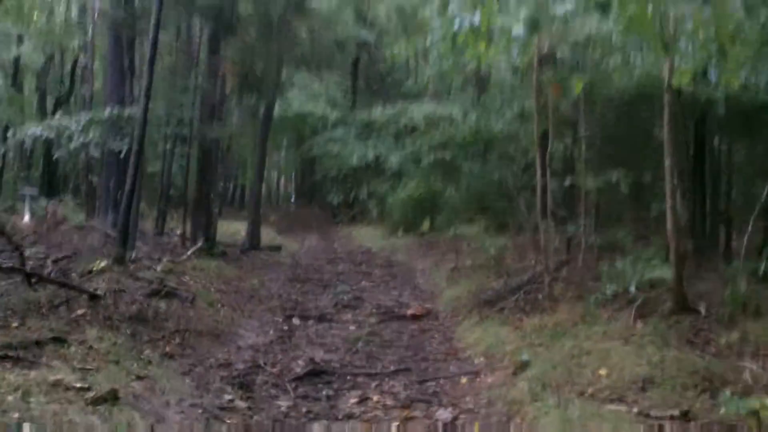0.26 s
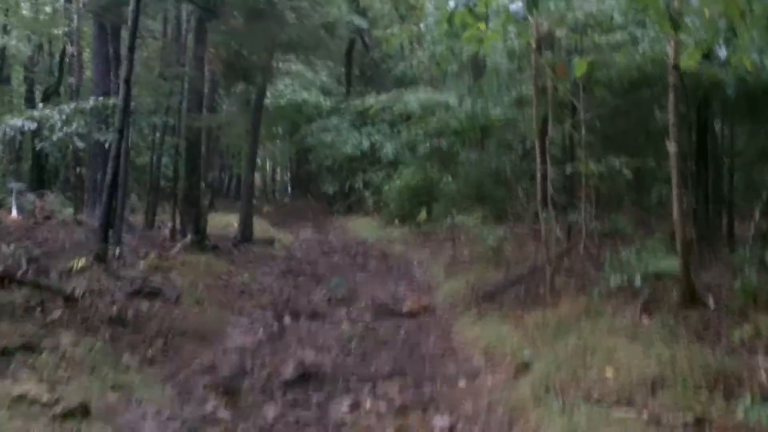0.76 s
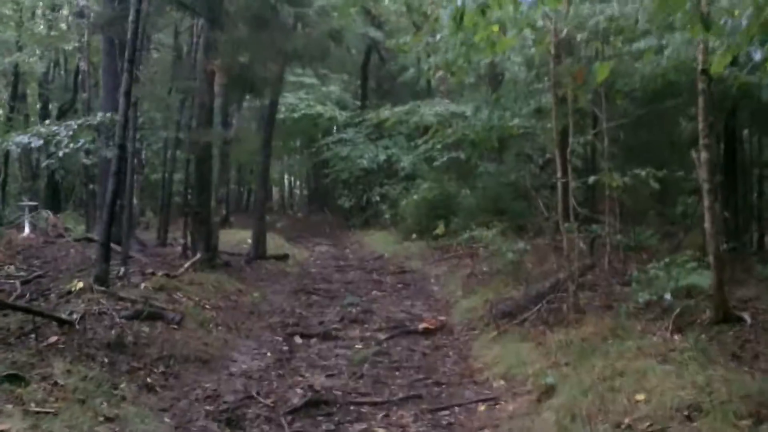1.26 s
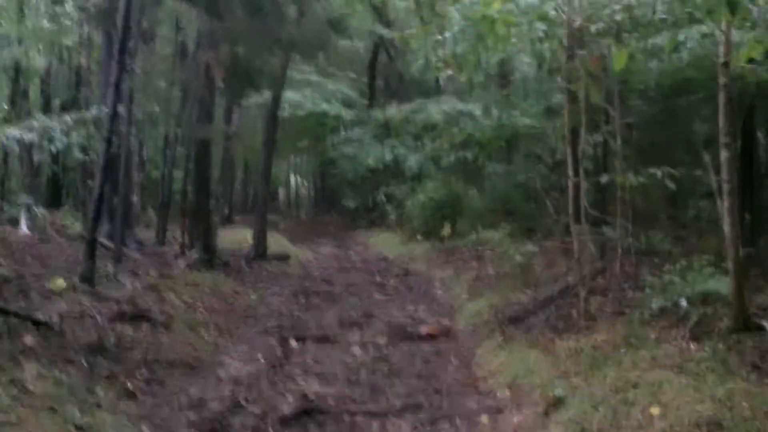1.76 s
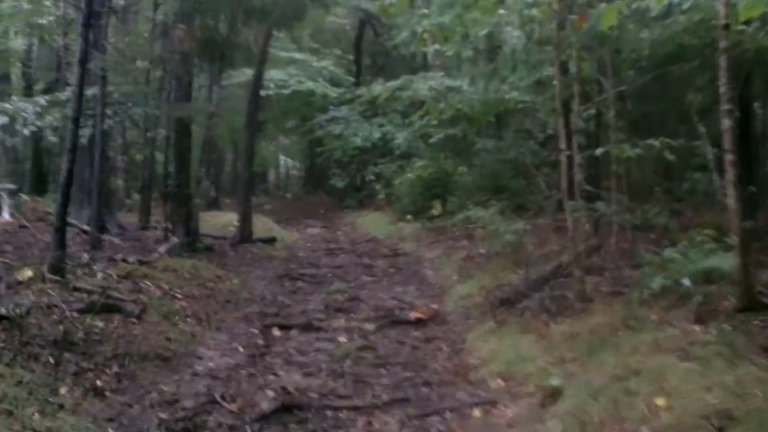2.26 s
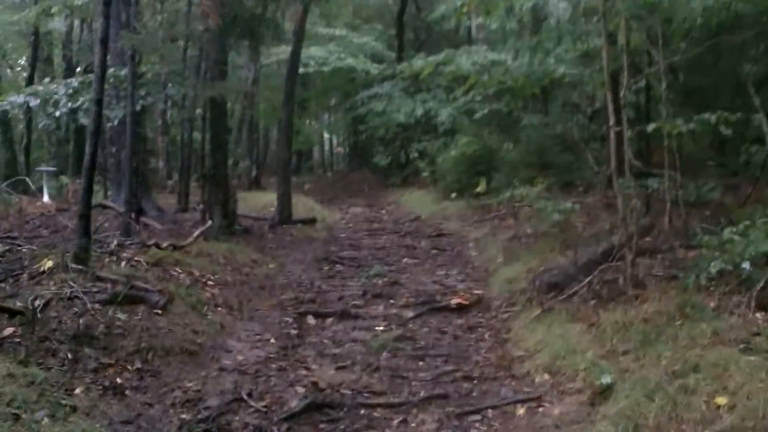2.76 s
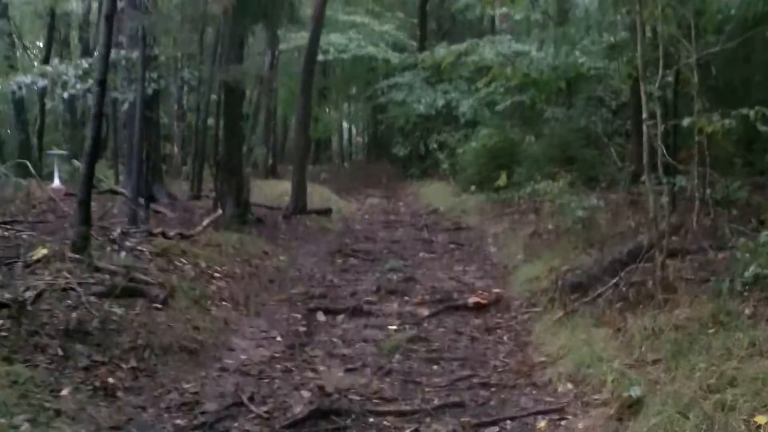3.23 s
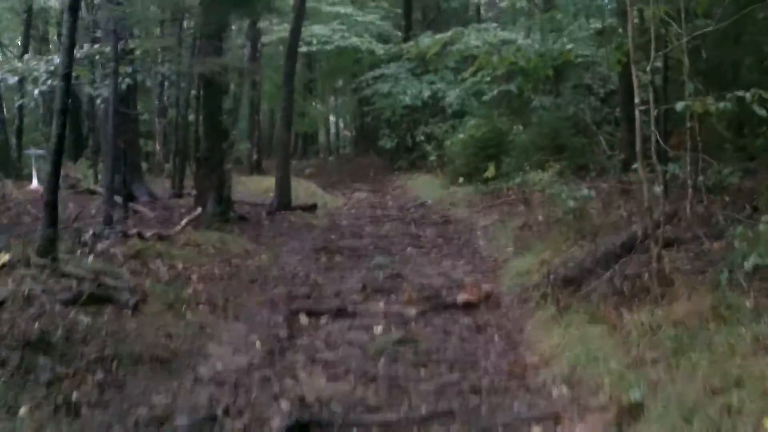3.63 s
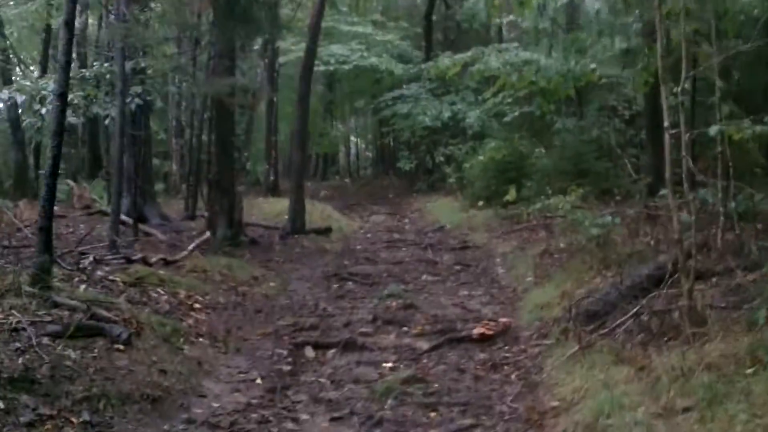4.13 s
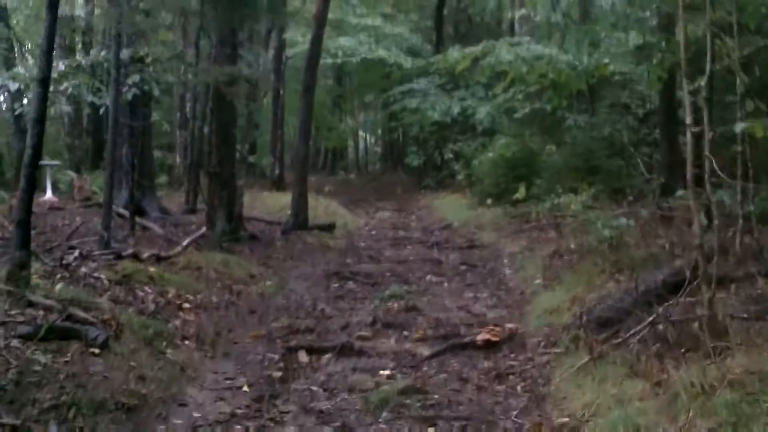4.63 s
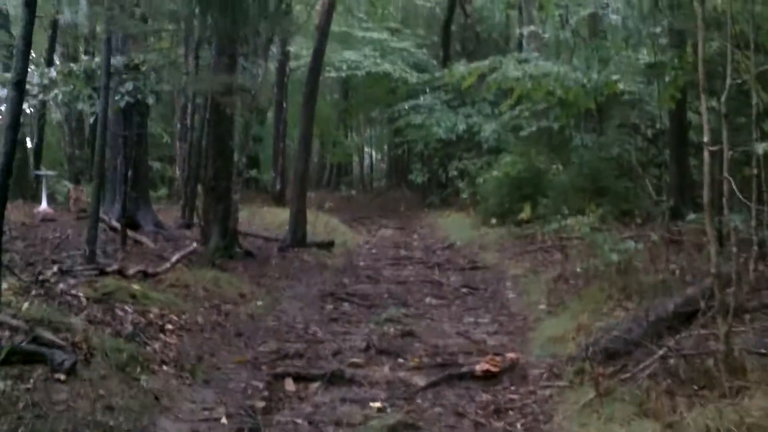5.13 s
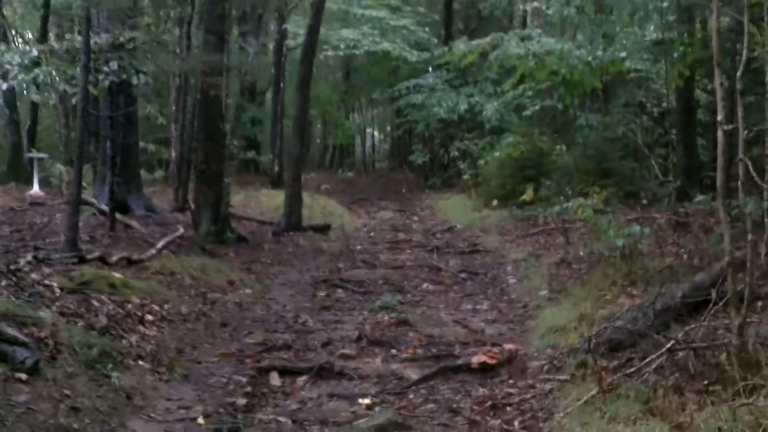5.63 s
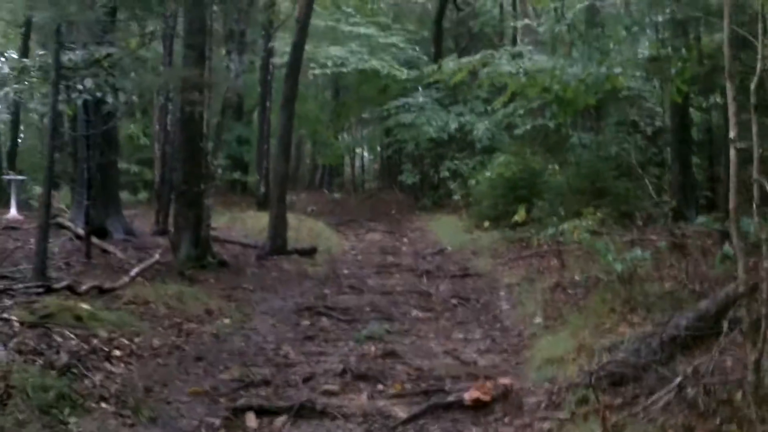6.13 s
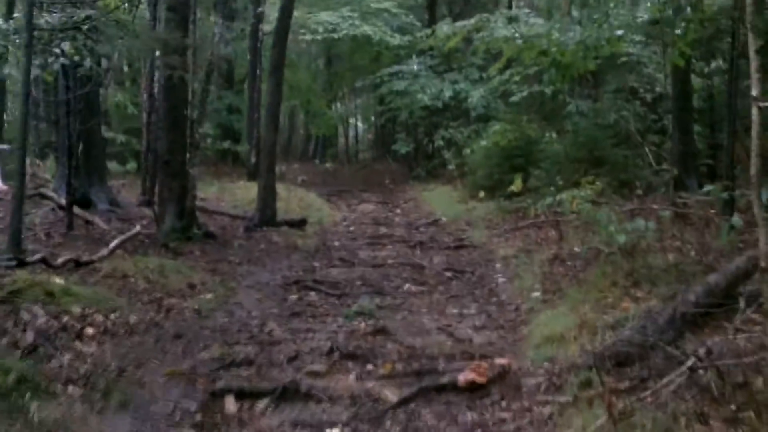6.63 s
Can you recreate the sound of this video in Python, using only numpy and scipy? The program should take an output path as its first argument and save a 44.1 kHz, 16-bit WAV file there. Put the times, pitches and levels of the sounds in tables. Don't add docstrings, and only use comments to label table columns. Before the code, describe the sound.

A quiet, close walk on a wet forest trail lasts about 7 seconds. Fine rain drums dully on a cover around the microphone, with faint patter on leaves, rising slightly near 1.6 s. Deep, uneven air rumble swells with arm swings, heavier near 4, 5.4, 6.2 and 6.9 s. Soft muddy steps are low, muffled thumps, clearer around 1.3, 2.2, 5.4 and 5.9 s. Light hollow taps and tiny leaf ticks scatter throughout. A drip pops at 0.36 s, then a very loud short smack at 0.63 s. A bright, splashy crack hits at 2.3 s, followed by a hollow drumlike knock at 2.6 s. Sharp ticks and a deep slack thump come around 3.8 s, a softer thud at 4.2 s, small bright ticks at 4.6 and 5.3 s, and a low, soft drip at 6.7 s. A barely audible regular electronic tick buzzes beneath.

```python
import sys
import numpy as np
from scipy import signal
from scipy.fft import rfft, irfft, next_fast_len
from scipy.io import wavfile
from scipy.ndimage import uniform_filter1d, map_coordinates

SR = 44100
rng = np.random.default_rng(int(sys.argv[2]) if len(sys.argv) > 2 else 0)


def voltage_ratio(decibels):
    exponent = np.asarray(decibels, float) / 20
    return 10 ** exponent


def pcm_store(signal):
    levels = np.round(np.clip(np.atleast_2d(signal), -1, 1) * 32767)
    wavfile.write(sys.argv[1], SR, levels.astype(np.int16).T)


N = 303408

# (time [s], level [dB])
RAIN_STRENGTH = [(0, -1.5), (.6, 0), (1.6, 1), (2.7, 0), (4.4, -1.5), (5.3, 0), (6.3, -1.5), (6.88, 0.5)]
# (frequency [Hz], level [dB])
DRUMMING_TONE = [(90, -27), (200, -6.5), (300, -2.5), (480, 0), (700, -5), (900, -15), (1300, -23),
                 (2500, -45.5), (6000, -120)]
# (frequency [Hz], level [dB])
PATTER_TONE = [(400, -16), (900, -5), (1300, -10.5), (1750, -9), (2900, -9), (3600, -5), (4800, -9.5),
               (6000, -16), (7600, -17.5), (8300, -20), (10000, -16.5), (12000, -16), (15200, -15.5)]
# (frequency [Hz], width [Hz], level [dB])
PATTER_PEAKS = [(1747, 120, 6), (2350, 90, 3)]
# (time [s], peak level [dB])
SWINGS = [(0, -27), (.44, -26.5), (.69, -40), (.94, -36), (1.17, -28.5), (1.44, -30.5), (1.65, -42.5),
          (1.86, -28.5), (2.02, -27.5), (2.23, -38.5), (2.42, -30.5), (2.59, -33.5), (2.83, -29.5),
          (3.14, -32.5), (3.54, -32), (3.67, -42.5), (3.951, -25), (4.218, -25.5), (4.661, -28.5),
          (4.96, -31.5), (5.25, -37), (5.439, -24.5), (5.65, -45), (5.79, -35.5), (6.188, -21),
          (6.57, -33.5), (6.859, -23)]
# (frequency [Hz], level [dB])
SWAY_TONE = [(3, -21.5), (8, 6), (14, 12), (21, 0), (28, -13), (40, -30.5), (60, -46.5), (150, -140)]
# (time [s], level [dB])
BREEZE = [(0, -47.5), (.5, -54.5), (1.1, -50), (1.9, -51), (2.2, -52), (2.7, -52.5), (3.4, -53),
          (3.95, -49.5), (4.3, -56), (4.9, -49), (5.5, -47.5), (5.85, -51), (6.22, -46.5), (6.5, -53),
          (6.7, -44.5), (6.88, -58)]
# (frequency [Hz], level [dB])
BUFFET_TONE = [(15, -27), (30, -7), (50, -7), (80, -13.5), (150, -21.5), (300, -33), (600, -73),
               (1500, -130)]
# (rate [1/s], frequency [Hz], t60 [ms])
CIRCUIT = (59.94, 8150, 5)
# (time [s], peak level [dB], frequency [Hz])
TAPS = [(0.0426, -50, 465), (0.5496, -49, 493), (0.571, -41.5, 510), (0.9429, -42, 664), (1.119, -38, 453),
        (1.285, -46, 557), (1.525, -46, 524), (1.9664, -44, 411), (1.993, -46, 477), (2.1602, -41, 536),
        (2.375, -45, 470), (2.4058, -47.5, 580), (2.436, -40, 480), (2.4503, -55, 505), (2.8972, -46, 494),
        (2.938, -43, 524), (3.0721, -37, 435), (3.2002, -46, 540), (3.856, -41, 432), (3.992, -48, 496),
        (4.055, -43, 510), (4.0996, -39, 580), (4.5233, -49.5, 516), (5.088, -43, 565),
        (5.1289, -46.5, 465), (5.292, -46, 690), (5.3846, -39, 547), (5.5609, -43.5, 546),
        (6.177, -35, 426)]
# (time [s], peak level [dB], frequency [Hz], life [cycles])
TICKS = [(0.295, -48, 2100, 9.3), (0.6131, -55, 1720, 14), (0.7605, -49, 1750, 10), (0.941, -44, 1730, 8.2),
         (1.071, -51.5, 2540, 15), (1.1735, -56, 2330, 10.7), (1.2, -49.5, 2600, 12),
         (1.814, -49, 2050, 6.1), (2.1604, -42, 2100, 5.2), (2.1782, -56, 2400, 5), (2.3436, -51, 2900, 11),
         (2.6135, -49, 1840, 12), (2.636, -53, 2910, 8.4), (3.2236, -52, 2840, 6.5),
         (3.5686, -54, 2540, 6.4), (3.685, -50, 2710, 14), (3.713, -41.5, 2480, 3.1),
         (3.7884, -47, 2130, 7.9), (3.7998, -31.5, 2940, 2.8), (3.993, -43.5, 1990, 5.2),
         (4.0769, -47.5, 2630, 4), (4.561, -42, 2820, 3.8), (4.6119, -32.5, 2240, 4.2),
         (4.7823, -44.5, 3380, 11), (4.841, -52, 2230, 6), (5.2906, -35, 2150, 3.1), (5.481, -52, 3200, 11),
         (6, -42.5, 2650, 4.8), (6.252, -50.5, 2950, 6)]
SPLASH_TIMES = [.3595, .626, .6292, 1.5445, 2.266, 2.2849, 2.2984, 2.602, 3.0292, 3.2547, 3.569, 3.7995,
                3.8378, 4.2043, 4.6122, 4.7825, 5.2903]
# (peak level [dB], length [ms], tilt [dB per octave])
SPLASHES = [(-25, .67, -9), (-14, .3, 0), (-25, .7, -9), (-56, .5, 0), (-47, .5, -1), (-47, .5, 0),
            (-3, 1.8, 2), (-32.5, 4, 6), (-35, .5, 5), (-52, .5, 12), (-52, .5, -6), (-38, .45, 6),
            (-33.5, 3.4, 2.5), (-44, 1.4, -8), (-44.5, .54, 0), (-43, .4, -18), (-44, .4, -24.5)]
# (frequency [Hz], level under the splash [dB], t60 [ms])
SHELL_MODES = [(5370, -8.5, 2.5), (8300, -14.5, 2), (10500, -28, 0.78), (13600, -18, 1.5)]
# (frequency [Hz], level [dB], t60 [ms], swell [ms], # side of the node
# [+1 or -1], travel from the struck spot [ms]); the tables below share these columns
FLAP = [(173, -2.5, 12, .15, 1, 1.1), (643, -0.5, 10.5, .03, -1, 0.24), (1530, -11, 0.72, .04, 1, 0.014)]
TAUT = [(194, -22, 15, .33, -1, 0), (427, -8, 8.9, 1.23, 1, 0.21), (795, -5.5, 3.8, 0.39, -1, .5),
        (1007, 0, 2.5, 0.037, -1, .3)]
LEAF = [(1200, 0, 8, .3, 1, 0)]
RIM = [(119, -24, 53, .15, 1, 0.35), (800, -19.5, 5.9, .17, -1, 0), (1770, -29, 28, .09, 1, .9),
       (3110, 0, 2, 0.008, -1, .3), (3700, -16, 5, .05, -1, .3), (1450, -18, 4, .05, -1, 0.295)]
LOOP = [(130, 0, 16, 1.5, 1, 0)]
HOLLOW = [(146, -6.5, 39, .36, 1, 2.2), (266, -9.5, 12, 1.2, -1, 0), (590, 0, 9.9, 1.6, -1, .5),
          (710, -10.5, 54, 0.15, -1, 1), (1030, -21, 14, .8, 1, .6), (1680, -22, 12, 0.65, 1, 0.5),
          (2400, -33, 6, .3, -1, 1), (3200, -32, 7.9, .3, 1, 2)]
SLACK = [(53, -14.5, 94, 1.3, 1, -1.8), (138, -12.5, 25, .26, 1, 1.7), (320, 0, 3.4, 1.9, 1, 1.224),
         (935, -9.5, 4.2, .22, 1, 0.23), (1850, -25, 3.8, .02, 1, 1.195), (2670, -32, 2.1, 0.069, 1, .6)]
FOLD = [(154, 0, 7.8, .62, -1, 0.0094)]
SAG = [(121, 0.5, 25, 0.59, -1, 4), (450, -16, 15, .18, -1, 6.5), (540, -11, 4.3, .03, 1, 0)]
HEM = [(101, -4, 95, 1.5, 1, 6), (242, -1.5, 24, 0.56, 1, 2.2), (564, 0.5, 16, 1.3, 1, 1),
       (713, -10, 38, 1, 1, 0.5), (880, -14, 10, 1, -1, -.5), (1700, -20.5, 12, 1.5, 1, -1.5)]
PANELS = [FLAP, TAUT, LEAF, RIM, LOOP, HOLLOW, SLACK, FOLD, SAG, HEM]
# (time [s], peak level [dB])
DRIPS = [
    (.3596, -19.5),
    (.6257, 1.5),
    (1.4135, -51.5),
    (2.2982, -8),
    (2.5895, -26),
    (2.6011, -10),
    (3.8384, -8),
    (3.8457, -16),
    (4.2046, -23),
    (6.663, -28.5),
]
# (time [s], peak level [dB], frequency [Hz])
THUMPS = [(0.573, -43, 100), (0.9427, -42, 78), (1.056, -48.5, 90), (1.122, -37, 138),
          (1.2889, -33.5, 91.5), (2.0442, -40.5, 86), (2.17, -33, 86.5), (2.4382, -38.5, 79.7),
          (3.661, -39, 108), (3.7966, -57, 60), (3.8905, -43, 61), (4.1436, -43.5, 140), (5.2481, -58, 101),
          (5.317, -50, 90.5), (5.37, -33, 107), (5.4366, -47, 80), (5.9282, -35, 94), (6.1856, -38, 104.6),
          (6.2467, -58, 112), (6.46, -44, 115), (6.5933, -42, 119)]
# (frequency [Hz], width [Hz])
PORTS = [(4180, 1000), (8800, 400), (12580, 330), (15850, 360)]
# (frequency [Hz], width [Hz], level [dB])
SHADOW = (7600, 800, -11)
# (frequency [Hz], level change above the edge [dB])
EQ_STEPS = [(4975, -5.5), (8500, -2), (15850, -12)]

DRUMMING_DB, PATTER_DB = -59, -63.5
PATTER_FOLLOWS, PATTER_FADES_DB = 0.28, 1.5
PATTER_TOP_HZ, TOP_HZ = 15350, 16800
SWING_S, STILL_DB = 0.077, -38
SPRAY_HZ = 2500
ANSWER_DB = -34
EDGE_HZ = 5


def unit(x):
    return x / np.sqrt(np.mean(x ** 2) + 1e-20)


def along(points, hz):
    f, v = np.transpose(points)
    return np.interp(np.log(hz + 1), np.log(f + 1), v)


def automation(rows):
    s, db = np.transpose(rows)
    return np.interp(np.arange(N) / SR, s, db)


def wobble(rate):
    knots = rng.standard_normal(int(N * rate / SR) + 4)
    return map_coordinates(knots, [np.arange(N) * rate / SR])


def filtered(x, response):
    m = next_fast_len(N + SR // 2)
    return irfft(rfft(x, m) * response(np.fft.rfftfreq(m, 1 / SR)), m)[..., :N]


def rings(s, gain, hz, t60, contact, size):
    t = np.arange(size) / SR
    s, gain, hz, t60, contact = (np.reshape(v, (-1, 1)) for v in (s, gain, hz, t60, contact))
    decay = voltage_ratio(-60 * t / t60)
    onset = 1 - np.exp(-t / contact)
    shape = decay * onset * np.sin(2 * np.pi * hz * t)
    shape = gain * shape / np.abs(shape).max(axis=1, keepdims=True)
    at = np.clip(np.round(s * SR).astype(int), 0, N) + np.arange(size)
    return np.bincount(at.ravel(), shape.ravel(), N + size + 1)[:N]


def shower(count, spread_db):
    draw = rng.random((count, 3))
    sizes = voltage_ratio(-spread_db * np.log(1 - draw[:, 1])) * np.sign(draw[:, 2] - .5)
    return unit(np.bincount((draw[:, 0] * N).astype(int), sizes, N))


def rain():
    strength_db = automation(RAIN_STRENGTH)
    drumming_db = DRUMMING_DB + strength_db + .8 * wobble(12)
    fade_db = PATTER_FADES_DB * np.arange(N) / N
    patter_db = PATTER_DB + PATTER_FOLLOWS * strength_db - fade_db + .4 * wobble(10)

    drumming = 0.8 * rng.standard_normal(N) + 0.61 * shower(count=7000, spread_db=2.0)
    drumming = unit(filtered(drumming, lambda hz: voltage_ratio(along(DRUMMING_TONE, hz))))

    def patter_colour(hz):
        peaks_db = sum(db / (1 + ((hz - c) / w) ** 2) for c, w, db in PATTER_PEAKS)
        return voltage_ratio(along(PATTER_TONE, hz) + peaks_db) * (hz < PATTER_TOP_HZ)

    patter = .85 * rng.standard_normal(N) + .45 * shower(count=9000, spread_db=2.8)
    patter = unit(filtered(patter, patter_colour))
    return voltage_ratio(drumming_db) * drumming + voltage_ratio(patter_db) * patter


def air():
    t = np.arange(N) / SR
    swings = voltage_ratio(STILL_DB) + sum(voltage_ratio(db) * np.exp(-((t - s) / SWING_S) ** 2) for s, db in SWINGS)
    sway = filtered(rng.standard_normal(N), lambda hz: voltage_ratio(along(SWAY_TONE, hz)))
    swell = np.sqrt(np.abs(uniform_filter1d(sway ** 2, size=7000))) / np.std(sway)
    sway = unit(sway / (swell + .25))
    buffet = filtered(rng.standard_normal(N), lambda hz: voltage_ratio(along(BUFFET_TONE, hz)))
    buffet = unit(voltage_ratio(3.4 * wobble(23)) * buffet)
    return swings * sway + voltage_ratio(automation(BREEZE)) * buffet


def circuit(peak_db):
    rate, hz, t60_ms = CIRCUIT
    s = np.arange(.0007, N / SR, 1 / rate)
    same = np.ones(len(s))
    t60 = t60_ms / 1000 * same
    return rings(s, voltage_ratio(peak_db) * same, hz * same, t60, contact=t60 / 20, size=512)


def light_hits(s, db, hz, cycles, soft):
    push = np.sign(rng.standard_normal(len(s)))
    start = s - (0.23 + soft) / hz
    return rings(start, push * voltage_ratio(db), hz, cycles / hz, soft / hz, size=4096)


def taps():
    return light_hits(*np.transpose(TAPS), cycles=6.7, soft=.15)


def leaf_ticks():
    s, db, hz, cycles = np.transpose(TICKS)
    return light_hits(s, db, hz, cycles, soft=cycles / 25)


def splashes():
    size = 1024
    out, t = np.zeros(N + size), np.arange(size) / SR
    hz = np.fft.rfftfreq(size, 1 / SR) + 20
    for s, (db, ms, tilt_db) in zip(SPLASH_TIMES, SPLASHES):
        front = 2 * (t == 0)
        spray = np.exp(-t * 2000 / ms) * (.4 * rng.standard_normal(size) - front)
        colour = voltage_ratio(tilt_db * np.log2(hz / SPRAY_HZ)) / (1 + (SPRAY_HZ / hz) ** 3)
        cepstrum = irfft(np.log(colour))
        cepstrum[1:512] *= 2
        cepstrum[513:] = 0
        burst = irfft(rfft(spray) * np.exp(rfft(cepstrum)))
        out[round(s * SR):][:size] += voltage_ratio(db) * burst / np.abs(burst).max()
    return out[:N]


def shell():
    top_hz = SHELL_MODES[-1][0]
    rows = []
    for s, (db, _, tilt_db) in zip(SPLASH_TIMES, SPLASHES):
        pivot_hz = top_hz if tilt_db > 0 else SPRAY_HZ
        for hz, mode_db, t60_ms in SHELL_MODES:
            gain = voltage_ratio(db + mode_db + tilt_db * np.log2(hz / pivot_hz))
            rows.append((s, gain, hz, t60_ms / 1000, t60_ms / 30000))
    return rings(*np.transpose(rows), size=1024)


def drums():
    rows = []
    for panel, (s, db) in zip(PANELS, DRIPS):
        for hz, mode_db, t60_ms, swell_ms, side, travel_ms in panel:
            gain = side * voltage_ratio(db + mode_db)
            rows.append((s + travel_ms / 1000, gain, hz, t60_ms / 1000, swell_ms / 1000))
    return rings(*np.transpose(rows), size=4096)


def cover_answer(near):
    t = np.arange(SR // 8) / SR
    answer = uniform_filter1d(rng.standard_normal(len(t)), size=9) * voltage_ratio(-60 * t / .03)
    return voltage_ratio(ANSWER_DB) * signal.fftconvolve(near, answer / np.linalg.norm(answer))[:N]


def footsteps():
    return light_hits(*np.transpose(THUMPS), cycles=3.5, soft=0.27)


def scene():
    bed = rain() + air() + circuit(peak_db=-66)
    near = taps() + leaf_ticks() + splashes() + shell() + drums()
    return (bed + near + cover_answer(near) + footsteps())[None]


def band_limit(x):
    return signal.sosfilt(signal.butter(12, 16780, fs=SR, output="sos"), x)


def record(dry):
    def microphone(hz):
        ports = np.prod([(c * c - hz * hz) / (c * c - hz * hz + 1j * hz * w) for c, w in PORTS], axis=0)
        dip_hz, width_hz, dip_db = SHADOW
        return ports * voltage_ratio(dip_db * np.exp(-((hz - dip_hz) / width_hz) ** 2))

    def equaliser(hz):
        bands_db = sum(db * (.5 + .5 * np.tanh((hz - edge) / EDGE_HZ)) for edge, db in EQ_STEPS)
        return voltage_ratio(bands_db) / (1 + (hz / TOP_HZ) ** 80)

    mix = filtered(dry, lambda hz: microphone(hz) * equaliser(hz))
    return band_limit(np.clip(mix, -1, 1))


dry = scene()
out = record(dry)
pcm_store(out)
```